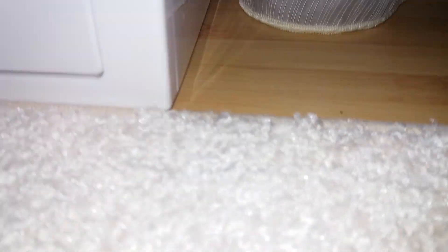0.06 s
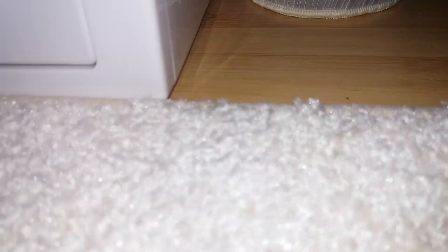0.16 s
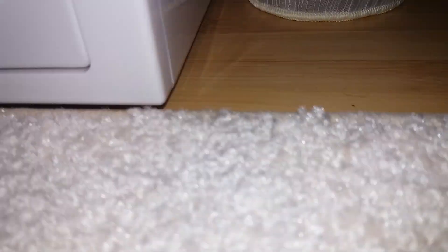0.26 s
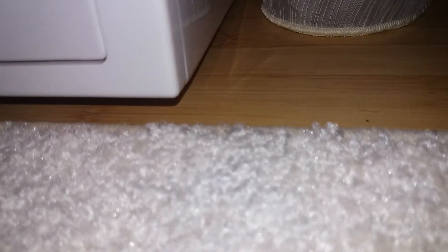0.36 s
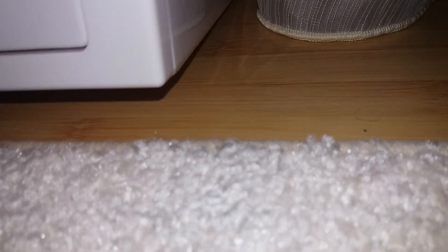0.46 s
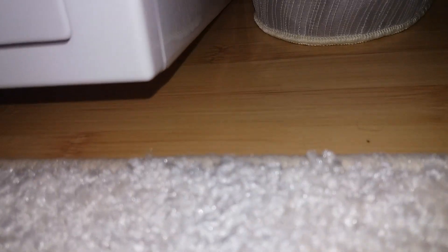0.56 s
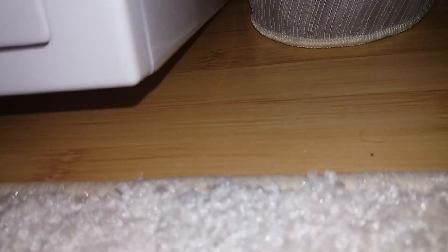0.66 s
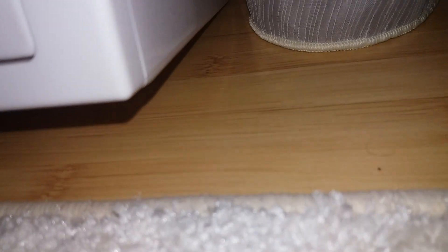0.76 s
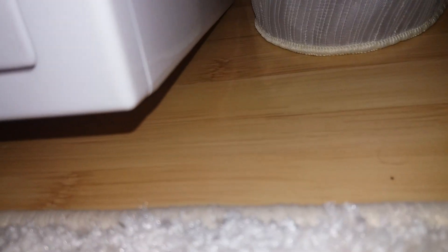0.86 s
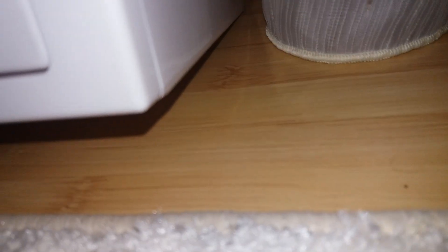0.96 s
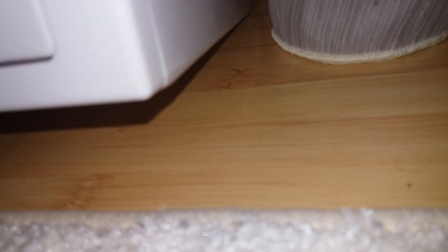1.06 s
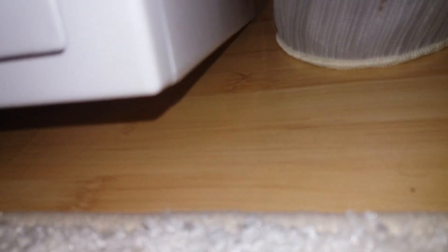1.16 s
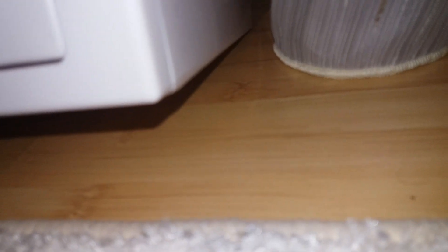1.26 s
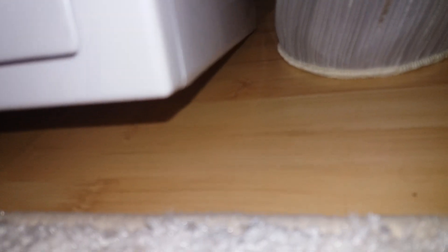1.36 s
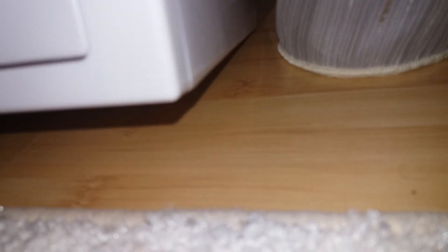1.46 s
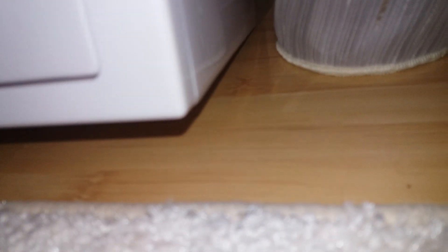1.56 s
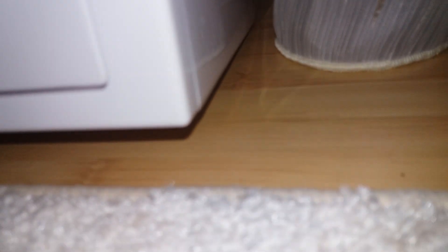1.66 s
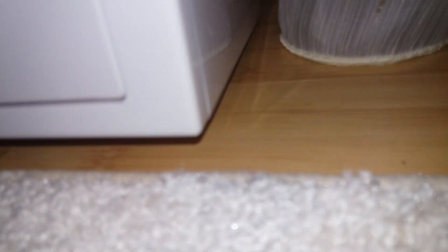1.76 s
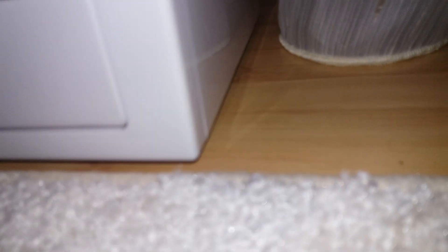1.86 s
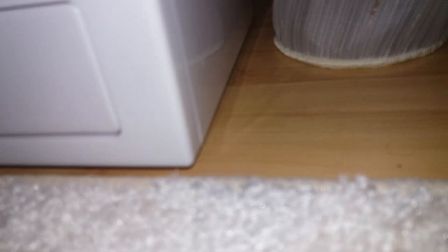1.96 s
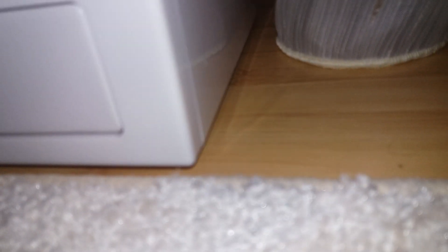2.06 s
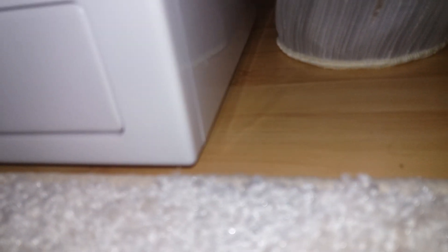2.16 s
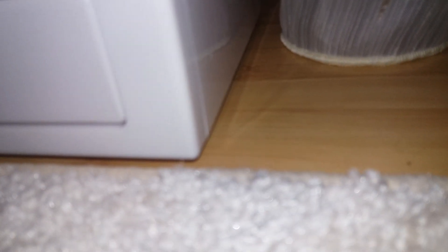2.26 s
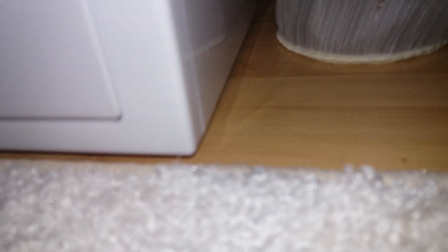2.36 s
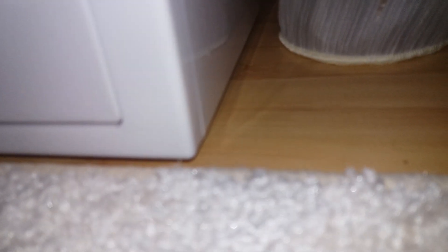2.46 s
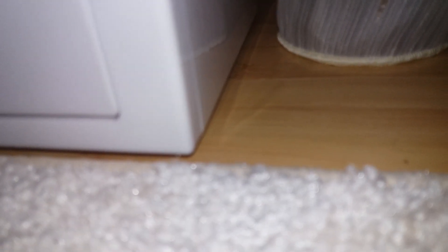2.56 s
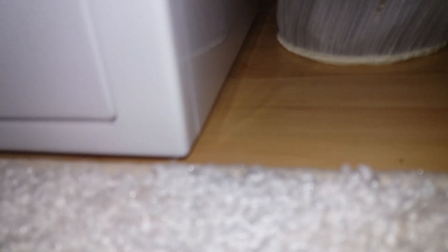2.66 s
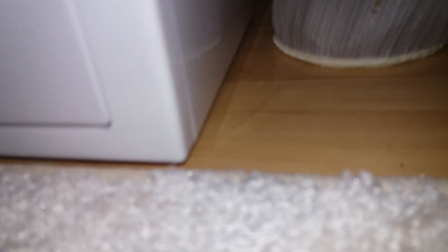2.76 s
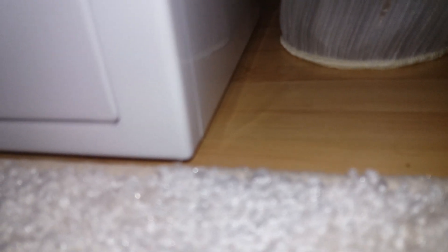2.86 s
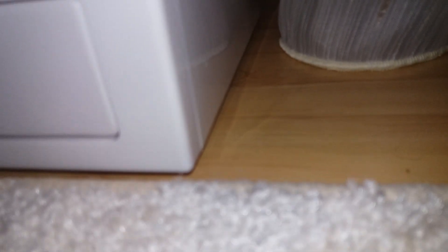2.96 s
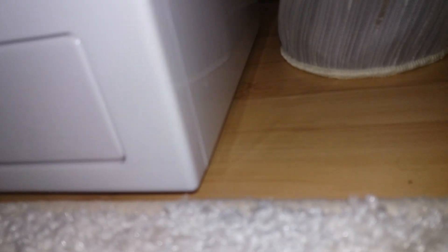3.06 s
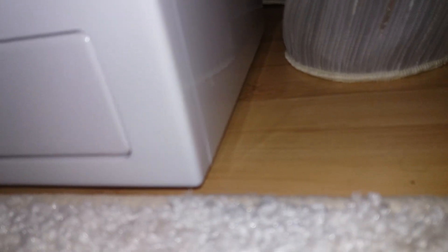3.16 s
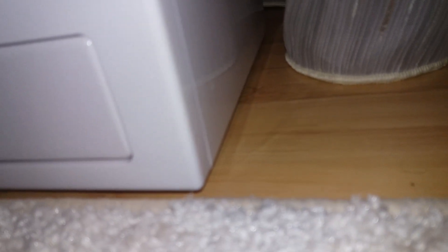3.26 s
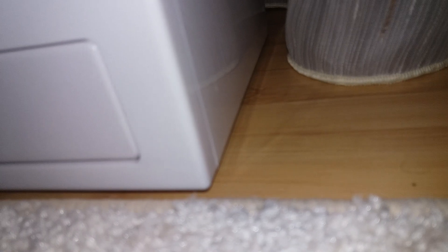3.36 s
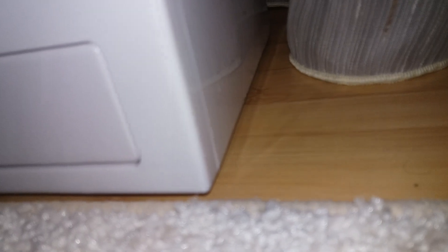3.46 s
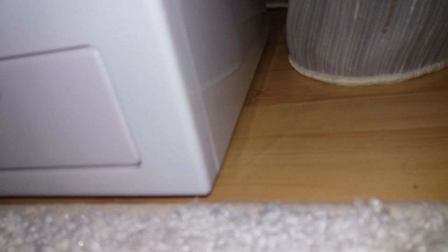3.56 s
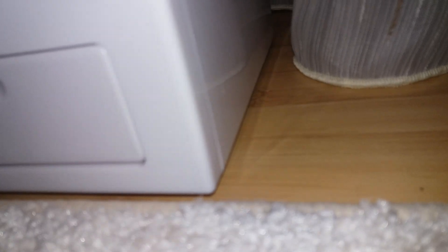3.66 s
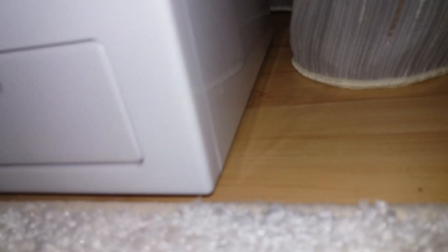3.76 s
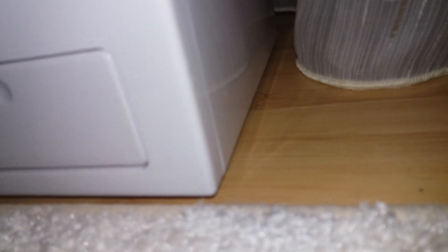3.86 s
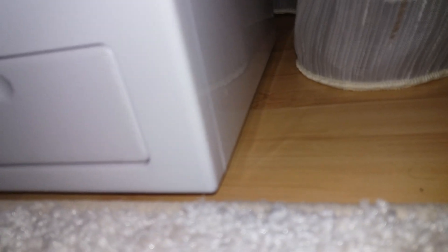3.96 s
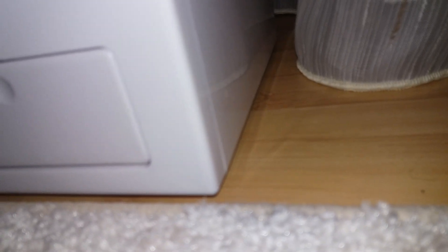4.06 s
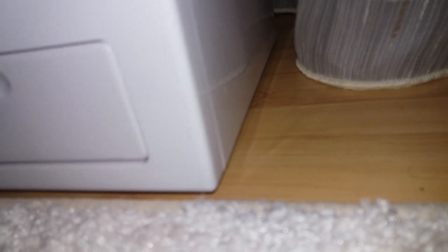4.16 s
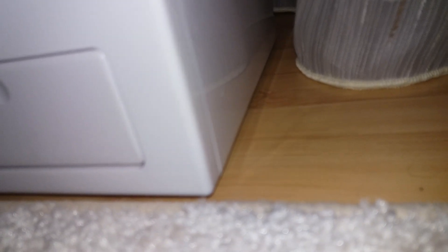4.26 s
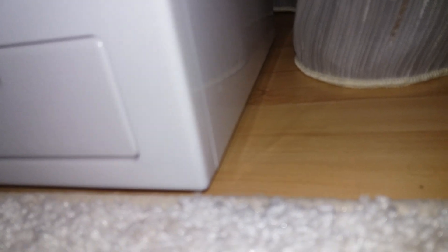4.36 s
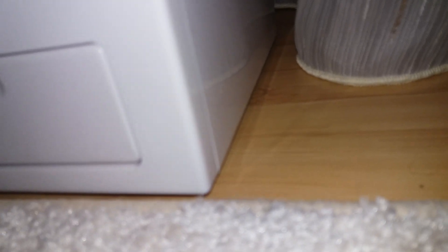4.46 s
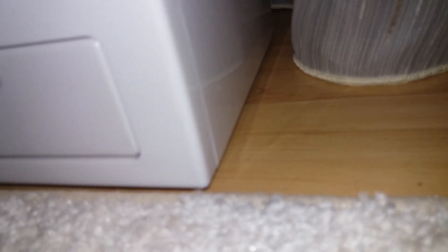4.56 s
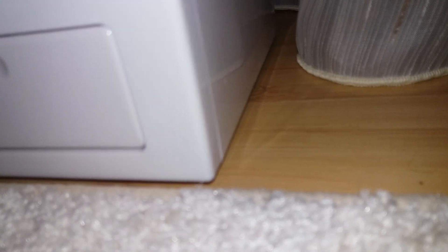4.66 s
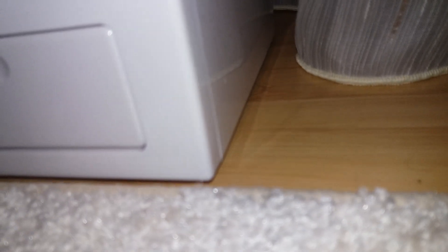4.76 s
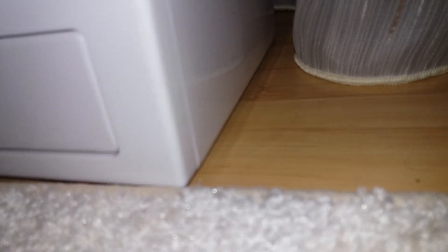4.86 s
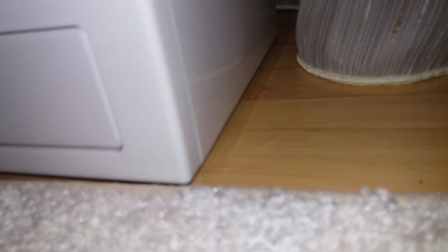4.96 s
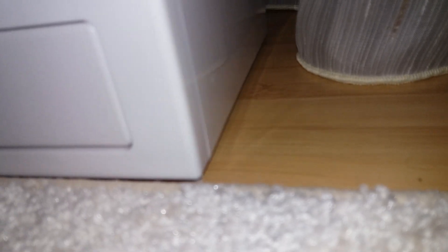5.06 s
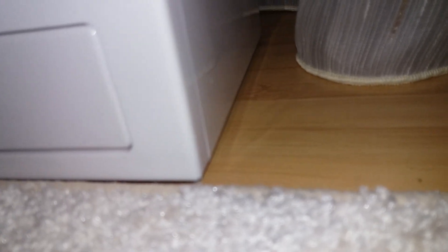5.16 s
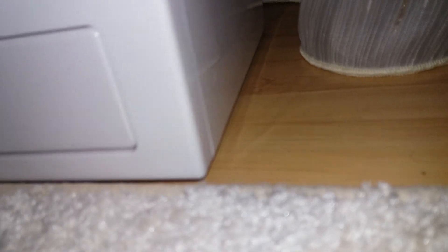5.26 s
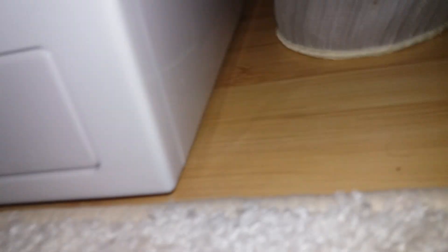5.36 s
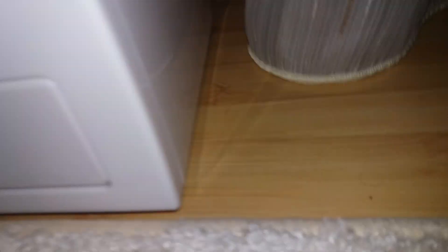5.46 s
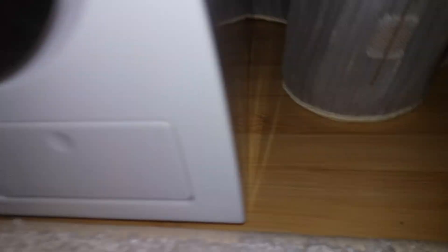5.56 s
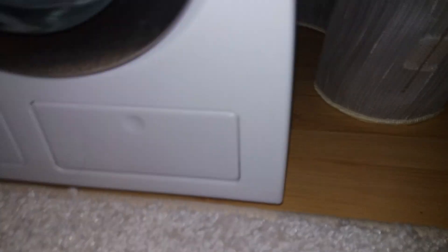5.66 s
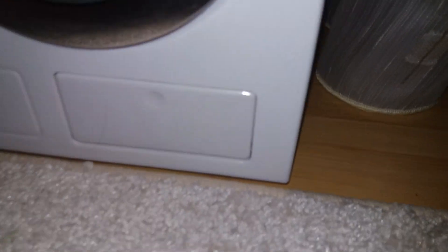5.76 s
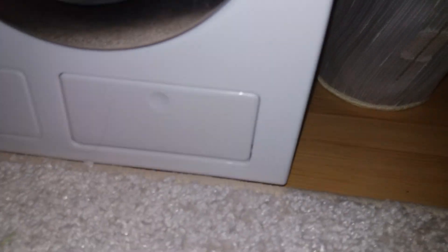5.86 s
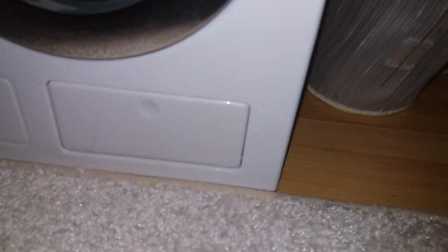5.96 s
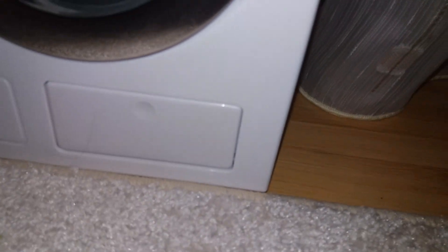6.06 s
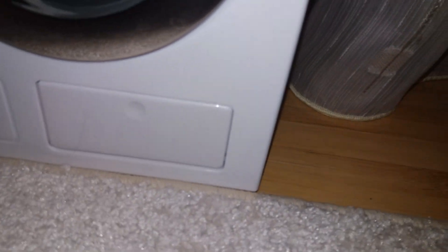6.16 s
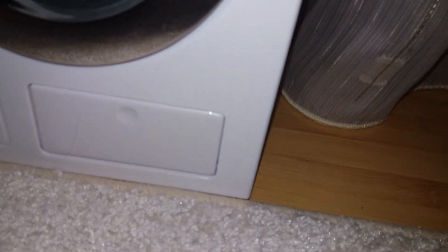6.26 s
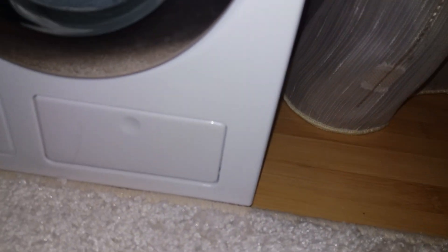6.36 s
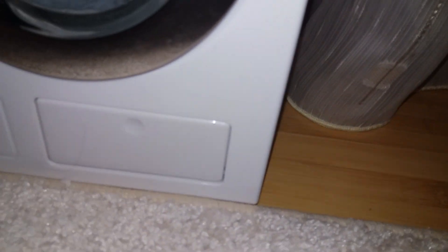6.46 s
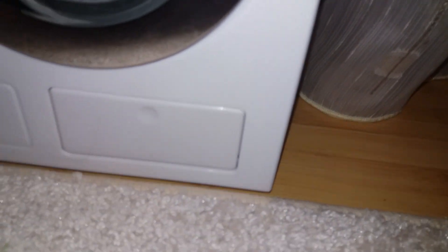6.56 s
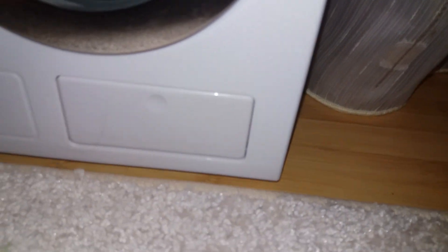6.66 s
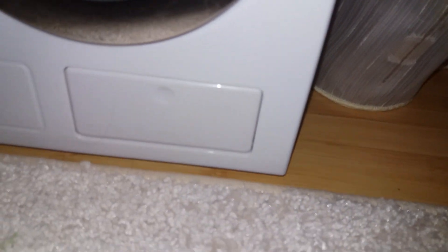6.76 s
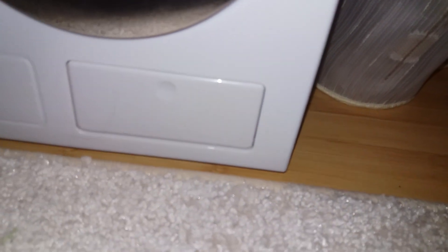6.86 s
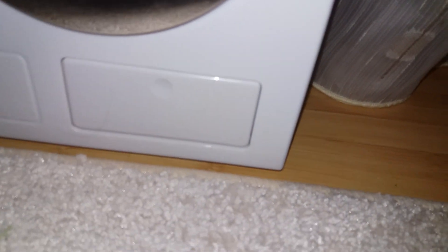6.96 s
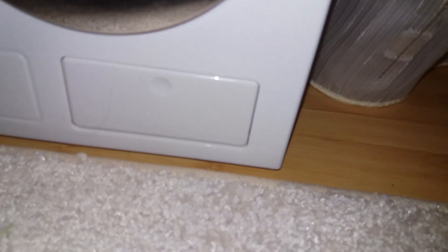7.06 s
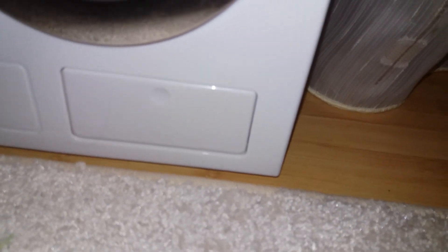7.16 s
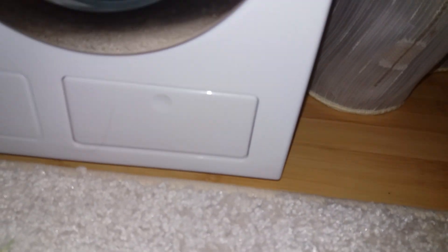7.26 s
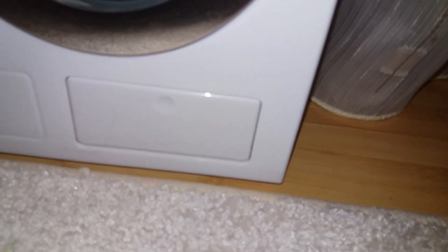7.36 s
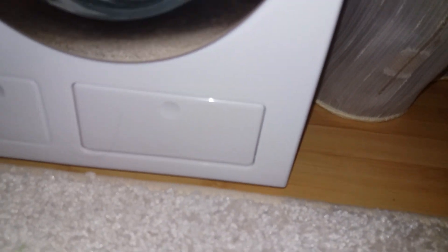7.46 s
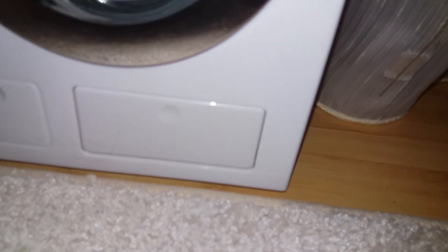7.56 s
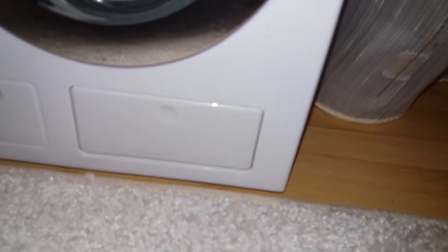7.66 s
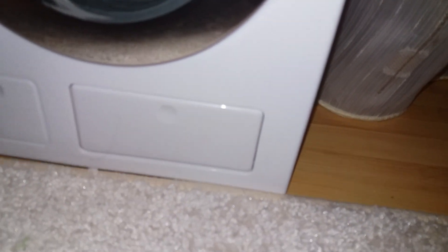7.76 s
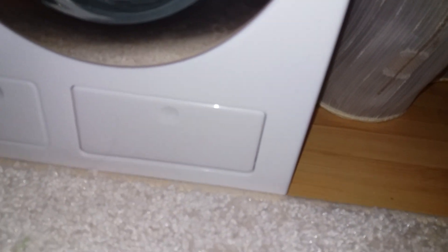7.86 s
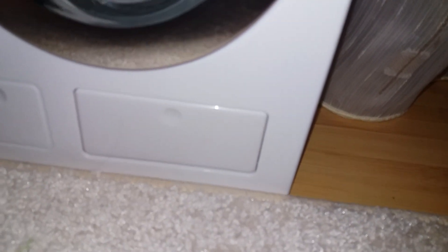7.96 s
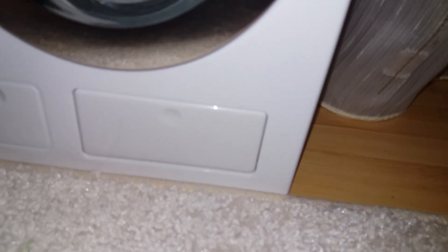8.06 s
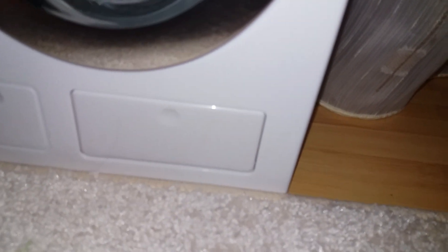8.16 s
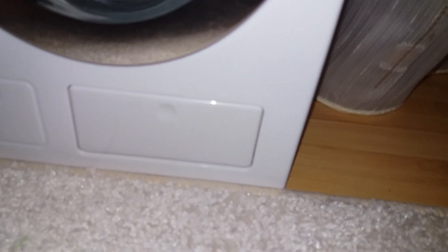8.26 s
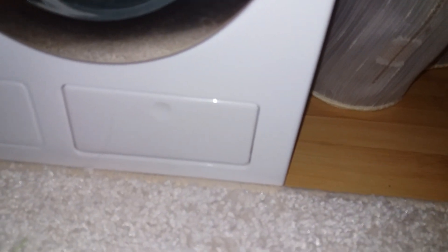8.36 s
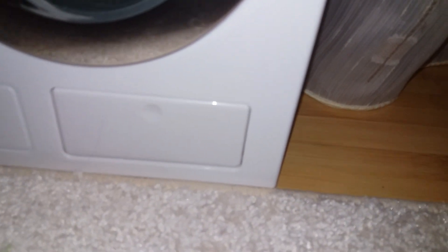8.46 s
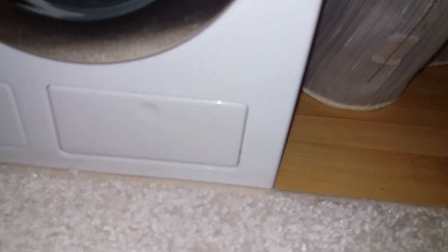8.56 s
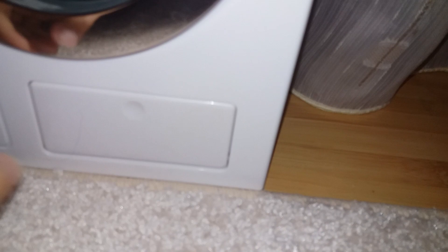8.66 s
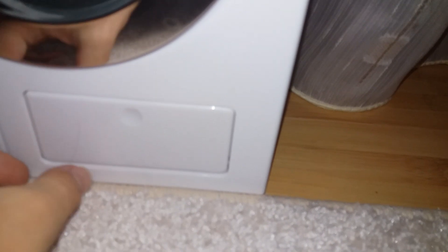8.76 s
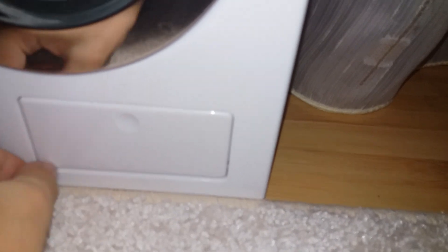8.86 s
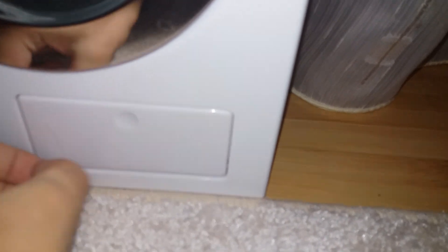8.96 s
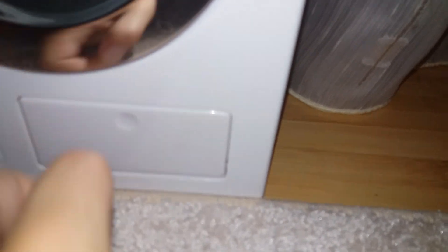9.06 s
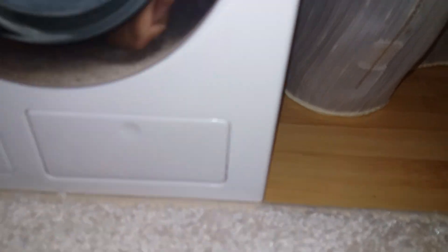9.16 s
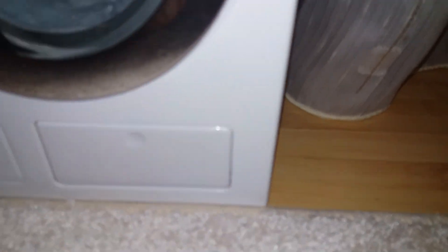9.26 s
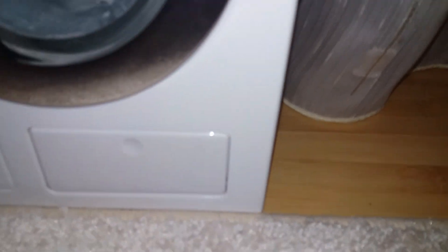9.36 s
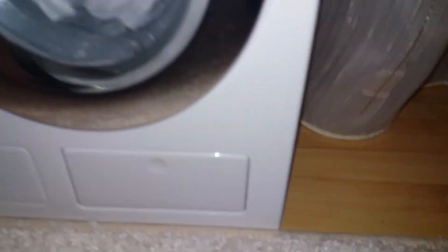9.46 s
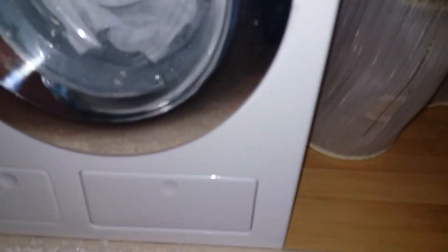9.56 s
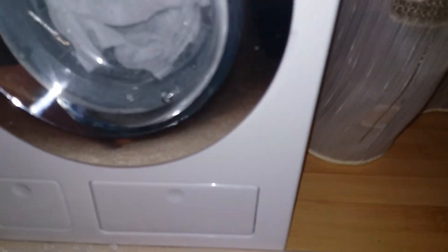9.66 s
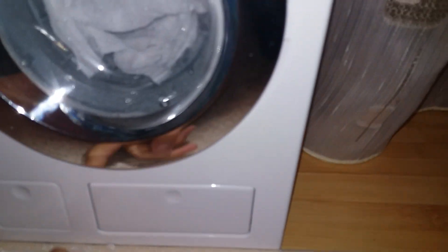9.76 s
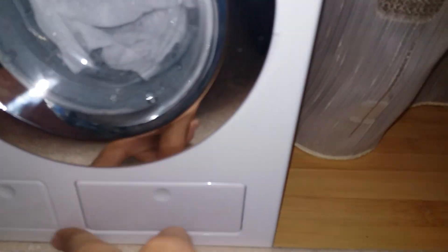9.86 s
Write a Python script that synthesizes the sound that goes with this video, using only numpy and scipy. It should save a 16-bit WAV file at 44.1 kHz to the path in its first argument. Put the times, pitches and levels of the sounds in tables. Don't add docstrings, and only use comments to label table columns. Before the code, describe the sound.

Irregular plastic knocks, clicks and scuffs from a hollow toy appliance, one huge drum-like bang early, over faint hum in a small room.

```python
import sys
import numpy as np
from scipy import signal
from scipy.fft import rfft, irfft
from scipy.io import wavfile

SR = 44100
rng = np.random.default_rng(int(sys.argv[2]) if len(sys.argv) > 2 else 0)


def ratio_of_db(decibels):
    return 10 ** (np.asarray(decibels, float) / 20)


def digitize_waveform(pressure):
    field = np.atleast_2d(pressure).T
    bounded = np.clip(field, -1, 1)
    quanta = np.round(bounded * 32767).astype(np.int16)
    wavfile.write(sys.argv[1], SR, quanta)


N = 437031
AFTER = np.arange(SR // 2) / SR

# (frequency [Hz], level [dB], t60 [s])
BOOM = [(151, -2.5, 0.42), (190, -4.5, 0.38), (221, 4, 0.12), (275, -13, 0.45)]
# (frequency [Hz], level [dB], t60 [s])
PANEL = [(354, -10.5, 0.048), (437.4, -2, 0.095), (516, -4.5, 0.052), (615, -6.5, 0.044),
         (710, -11.5, 0.11), (783, -10, 0.066), (863.6, -8.5, 0.11), (925, -9, 0.1), (1050, -12.5, 0.16),
         (1240, -11.5, 0.0062)]


def rms_one(x):
    return x / np.sqrt(np.mean(x ** 2) + 1e-20)


def peak_one(x):
    return x / (np.max(np.abs(x)) + 1e-12)


def band(x, low_hz, high_hz):
    return signal.sosfilt(signal.butter(2, [low_hz, high_hz], "band", fs=SR, output="sos"), x)


def coloured(x, points):
    hz, level_db = np.transpose(points)
    log_hz = np.log(np.fft.rfftfreq(N, 1 / SR) + 1)
    shape_db = np.interp(log_hz, np.log(hz), level_db)
    shape_db -= 40 * np.maximum(log_hz - np.log(hz[-1]), 0)
    return rms_one(irfft(rfft(x) * ratio_of_db(shape_db), N))


def resonate(x, hz, width_hz):
    r = np.exp(-np.pi * width_hz / SR)
    feedback = [1, -2 * r * np.cos(2 * np.pi * hz / SR), r * r]
    return signal.lfilter((1 - r * r) / 2 * np.array([1, 0, -1]), feedback, x)


def drift(rate_per_s):
    steps = rng.standard_normal(4000)
    return np.interp(np.arange(N) / SR * rate_per_s, np.arange(len(steps)), steps)


def stroke(middle_s, length_s):
    out = np.zeros(N)
    first = max(round((middle_s - length_s) * SR), 0)
    last = min(round((middle_s + length_s) * SR), N)
    near = np.arange(first, last)
    out[near] = np.cos(np.pi / 2 * np.clip((near / SR - middle_s) / length_s, -1, 1)) ** 2
    return out


def struck(modes, spread_db):
    hz, level_db, t60_s = np.transpose(modes)[:, :, None]
    luck = rng.standard_normal((len(modes), 1))
    decay = ratio_of_db(level_db + spread_db * luck - 60 * AFTER / t60_s)
    return peak_one(np.sum(decay * np.sin(2 * np.pi * hz * AFTER), axis=0))


def dying(low_hz, high_hz, t60_s):
    return peak_one(band(rng.standard_normal(len(AFTER)) * ratio_of_db(-60 * AFTER / t60_s), low_hz, high_hz))


def rattled(ringing, length_s, cut_hz):
    chatter = rng.standard_normal(SR // 16) * np.exp(-AFTER[:SR // 16] / length_s)
    chatter[0] = 5.35
    soft = signal.sosfilt(signal.butter(4, cut_hz, fs=SR, output="sos"), chatter)
    soft = band(soft, 120, cut_hz)
    return peak_one(signal.fftconvolve(ringing, soft)[:len(AFTER)])


def add(out, s, sound):
    i = round(s * SR)
    out[i:i + len(sound)] += sound[:N - i]


def background():
    # (frequency [Hz], width [Hz], level [dB])
    hum_bands = [(89, 14, -86.5), (169, 9, -70.5)]
    # (frequency [Hz], density [dB per Hz])
    air_and_hiss_points = [(20, -35), (33, -35), (50, 0), (80, -3), (170, -7), (300, -5.5), (600, -18),
                           (1200, -19), (2500, -21), (4000, -28), (6500, -32.5), (10000, -32.5), (16000, -30.5)]
    hum = sum(ratio_of_db(level_db) * rms_one(resonate(rng.standard_normal(N), hz, width_hz))
              for hz, width_hz, level_db in hum_bands)
    return hum + ratio_of_db(-67.5) * coloured(rng.standard_normal(N), air_and_hiss_points)


def room():
    # (frequency [Hz], t60 [s], level [dB])
    room_bands = [(486, 0.16, -3.5), (1200, 0.084, -10), (2510, 0.25, -11.5), (4686, 0.14, -8),
                  (9050, 0.091, -21.5)]
    half_width = 1.55
    tail = np.zeros(len(AFTER))
    for hz, t60_s, level_db in room_bands:
        noise = rms_one(band(rng.standard_normal(len(AFTER)), hz / half_width, hz * half_width))
        gain = ratio_of_db(level_db) * np.sqrt(hz / t60_s / SR ** 2 * 30)
        tail += gain * noise * ratio_of_db(-60 * AFTER / t60_s)
    return tail * np.clip((AFTER - .004) / 0.0016, 0, 1)


def squeaks():
    # (middle [s], length [s], level [dB], frequency [Hz], width [Hz])
    squeak_events = [(0.035, 0.11, -63.5, 2030, 260), (0.092, 0.07, -69, 3980, 260),
                     (0.19, 0.078, -69, 3600, 240), (6.265, .03, -72, 3600, 250),
                     (3.453, .05, -64, 2450, 150)]
    out = np.zeros(N)
    for middle_s, length_s, level_db, hz, width_hz in squeak_events:
        tone = resonate(resonate(rng.standard_normal(N), hz, width_hz), hz, 3 * width_hz)
        out += ratio_of_db(level_db) * stroke(middle_s, length_s) * rms_one(tone)
    return out


def drag():
    # (time [s], level [dB])
    handling = [(0, -70), (.3, -75), (.88, -62.5), (1.1, -69), (1.45, -74), (1.8, -65.5), (2.4, -73),
                (3.1, -77.5), (3.64, -68.5), (4.2, -76.5), (4.8, -78), (5.5, -70.5), (6.7, -74),
                (6.95, -84), (8.1, -80), (8.85, -70), (9.08, -71), (9.62, -86)]
    # (middle [s], length [s], scuff [dB], body [dB], floor shake [dB])
    leans = [(0.136, 0.11, -70, -63, -93), (0.304, 0.18, -88, -90, -69), (0.5, 0.18, -78, -63.5, -80),
             (0.86, 0.15, -74, -91, -78), (1.346, 0.14, -76.5, -67, -51.5), (1.584, 0.19, -87, -77, -53.5),
             (2.061, 0.23, -68, -58, -52.5), (2.543, 0.43, -100, -86.5, -73),
             (3.237, 0.19, -66.5, -59.5, -62), (3.58, 0.27, -84, -66, -62), (3.937, 0.37, -99, -82, -67),
             (4.748, 0.37, -87, -82.5, -67), (5.135, 0.27, -74.5, -64, -62), (6.018, 0.11, -76.5, -68, -55),
             (6.323, 0.26, -68.5, -61, -60), (6.546, 0.26, -79, -80, -56), (6.75, 0.18, -72, -70.5, -66),
             (7.156, 0.31, -93.5, -83.5, -72.5), (7.9, 0.19, -73.5, -67.5, -62),
             (8.416, 0.19, -72.5, -68, -59.5), (9.573, 0.34, -76.5, -108, -71.5)]
    # (middle [s], length [s], scuff [dB], body [dB], fizz [dB])
    slips = [(0.178, 0.32, -82, -84, -74.5), (1.567, 0.013, -74, -93, -98), (1.77, 0.021, -61, -56, -99),
             (1.852, 0.066, -65.5, -64, -95), (1.974, 0.014, -61, -59, -99), (3.19, 0.014, -65, -52, -87),
             (3.475, 0.07, -58, -49.5, -82), (3.863, .05, -74.5, -81, -93.5), (4.971, 0.087, -61, -53, -90),
             (5.172, 0.075, -59.5, -56.5, -82), (5.177, 0.034, -59.5, -56, -77),
             (5.469, 0.036, -55.5, -58, -92), (5.54, 0.13, -101, -82, -79),
             (5.756, 0.11, -73.5, -76, -89.5), (5.896, 0.076, -69.5, -87, -96),
             (6.362, 0.016, -61, -57, -89), (6.428, 0.034, -72, -66, -88), (6.561, 0.02, -63, -50, -95),
             (6.604, 0.046, -74, -66, -82), (6.697, 0.11, -66.5, -59, -84), (8.371, 0.042, -66, -54.5, -92),
             (8.504, 0.087, -75.5, -84, -93.5), (9.168, 0.0028, -59, -90, -56),
             (9.155, 0.056, -65, -85, -90), (9.283, 0.064, -59, -80, -76), (9.365, 0.068, -68, -85, -85),
             (9.606, 0.12, -78, -94, -94), (9.91, 0.066, -67.5, -82, -86)]
    # (frequency [Hz], density [dB per Hz])
    scuff_points = [(200, -22.5), (500, -13.5), (1000, -3.5), (1600, 3.5), (2400, -1), (3300, -5),
                    (4300, -13.5), (5500, -29)]
    # (frequency [Hz], density [dB per Hz])
    fizz_points = [(2500, -32), (4000, -3), (5500, -3.5), (7500, -9.5), (11000, -20.5)]

    busy_db = np.interp(np.arange(N) / SR, *np.transpose(handling))
    swing_db = busy_db + 73
    scuff_gain = ratio_of_db(busy_db)
    body_gain = ratio_of_db(-68.5 + 0.11 * swing_db)
    shake_gain = ratio_of_db(-74.5 + 0.1 * swing_db)
    for middle_s, length_s, scuff_db, body_db, shake_db in leans:
        shape = stroke(middle_s, length_s)
        scuff_gain += ratio_of_db(scuff_db) * shape
        body_gain += ratio_of_db(body_db) * shape
        shake_gain += ratio_of_db(shake_db) * shape
    fizz_gain = ratio_of_db(-18) * scuff_gain
    for middle_s, length_s, scuff_db, body_db, fizz_db in slips:
        shape = stroke(middle_s, length_s)
        scuff_gain += ratio_of_db(scuff_db) * shape
        body_gain += ratio_of_db(body_db) * shape
        fizz_gain += ratio_of_db(fizz_db) * shape

    grains = (rng.random(N) < 9000 / SR) * rng.choice([-1, 1], N)
    grains = grains * ratio_of_db(1.66 * np.minimum(rng.exponential(1, N), 4))
    scuff = coloured(grains, scuff_points) * scuff_gain + coloured(grains, fizz_points) * fizz_gain
    scuff *= ratio_of_db(1.2 * drift(70))
    body = sum(ratio_of_db(level_db) * resonate(grains, hz, 2.8 / t60_s + 12) / np.sqrt(hz)
               for hz, level_db, t60_s in BOOM + PANEL)
    body = rms_one(band(body, 130, 1500))
    shake = resonate(resonate(rng.standard_normal(N), 96, 40), 67, 90)
    shake = rms_one(shake + ratio_of_db(-20.0) * resonate(rng.standard_normal(N), 40, 20))
    return scuff + body * body_gain * ratio_of_db(1.9 * drift(25)) + shake * shake_gain


def single_modes(events):
    out = np.zeros(N)
    for s, peak_db, hz, t60_s in events:
        onset = 1 - np.exp(-AFTER / max(.0008, 0.56 / hz))
        add(out, s, ratio_of_db(peak_db) * peak_one(struck([(hz, 0, t60_s)], spread_db=0) * onset))
    return out


def clinks():
    # (time [s], peak [dB], frequency [Hz], t60 [s])
    clink_events = [(.152, -33.5, 3530, 0.011), (1.246, -48, 2600, 0.025), (1.600, -44, 422, 0.11),
                    (1.7851, -31.5, 2510, 0.012), (1.8101, -42.5, 2570, 0.021), (4.515, -62, 597, 0.15),
                    (4.572, -59, 597, 0.14), (4.700, -45.5, 400, 0.062), (6.142, -46, 3500, 0.026),
                    (6.1431, -33, 925, 0.084), (6.287, -42, 761, 0.049), (7.895, -54, 904, 0.03),
                    (1.786, -44, 3300, 0.0116)]
    return single_modes(clink_events)


def rings():
    # (time [s], peak [dB], frequency [Hz], t60 [s])
    ring_events = [(1.9985, -18, 1600, 0.028), (1.998, -23, 350, .08), (1.999, -27, 860, 0.087),
                   (2.003, -33.5, 1335, .07), (1.999, -34.5, 4400, .02), (6.143, -29.5, 428, 0.1),
                   (6.143, -40, 2120, 0.029), (6.143, -47, 1520, 0.043), (3.408, -48, 2700, .025),
                   (3.095, -46, 3200, 0.012), (4.699, -56, 1150, .04), (4.699, -51, 1790, 0.02),
                   (2.738, -55, 1100, 0.043), (1.602, -43, 333, .08), (3.59, -43, 895, .05),
                   (0.434, -43, 637, .05), (8.951, -48, 1150, 0.046), (9.165, -49, 1400, 0.012),
                   (0.034, -40.5, 620, 0.065), (3.8, -51, 63, 0.21), (3.81, -68, 60, .15),
                   (4.07, -62, 61, 0.19), (3.412, -37.5, 232, 0.33), (0.451, -34.5, 232, 0.21),
                   (8.37, -46, 130, .3), (5.22, -51.5, 61, 0.24), (1.9, -52, 82, .2)]
    return single_modes(ring_events)


def overtones():
    # (time [s], peak [dB], frequency [Hz], t60 [s])
    overtone_events = [(2.003, -36, 1065, .09), (1.998, -27, 2550, .01), (1.998, -24, 2000, .015),
                       (1.998, -25, 890, 0.036), (2.012, -33, 533, .12), (1.998, -23, 422, .04),
                       (2.105, -41, 229.2, 0.49), (1.999, -33, 2940, 0.061), (6.15, -45, 505, .1),
                       (6.143, -45, 1870, .07), (6.143, -47, 649, .12), (6.19, -55, 1010, .05),
                       (6.287, -51, 2050, .02), (6.287, -49, 1500, .03), (6.292, -47, 523, 0.053),
                       (6.425, -54.5, 1080, .06), (6.553, -53, 1410, .03), (6.651, -57, 1096, .06),
                       (3.096, -50, 927, .06), (3.096, -49, 1334, .05), (3.096, -49, 2024, .03),
                       (3.096, -51, 2369, .05), (3.096, -48, 3500, .03), (3.404, -44, 3150, .02),
                       (0.3035, -50, 2950, .012), (0.3035, -50, 3700, .015), (1.602, -45, 870, .07),
                       (0.772, -47.5, 1800, .02), (2.742, -44, 232, .2), (4.7, -42, 524, 0.062),
                       (4.706, -36.5, 214.5, 0.14), (4.329, -43.5, 590, .05), (4.345, -42, 228, 0.13),
                       (4.392, -47.5, 521, 0.063), (8.362, -46, 498, .1), (8.362, -52, 910, 0.092),
                       (8.365, -55, 1300, 0.062), (8.951, -50, 2026, .07), (8.951, -44.5, 420, .05),
                       (5.157, -41, 225, .1), (5.172, -35.5, 230, 0.075), (0.434, -44, 500, 0.065),
                       (8.975, -52, 417, .06)]
    return single_modes(overtone_events)


def buzzes():
    # (time [s], peak [dB], low edge [Hz], high edge [Hz], t60 [s])
    buzz_events = [(2.02, -47, 2600, 5200, .25), (8.336, -61, 2800, 4600, .08),
                   (8.347, -60, 2800, 5000, .06), (2.01, -38, 1500, 3600, .2),
                   (3.5862, -38, 1000, 4500, .008), (7.894, -50, 500, 2200, .01),
                   (0.3032, -46, 1800, 4200, .02), (0.432, -46, 1500, 3200, .025),
                   (4.327, -48, 900, 3000, .03), (6.1418, -36, 700, 4000, .01),
                   (1.602, -48, 1300, 2600, .015), (6.2865, -46, 600, 2200, .02),
                   (6.286, -58, 3500, 6000, .04), (6.318, -58, 3400, 4500, .04),
                   (6.548, -58, 2500, 4200, .04), (9.4, -55, 600, 2000, .03), (0.152, -56, 3700, 7500, .2)]
    out = np.zeros(N)
    for s, peak_db, low_hz, high_hz, t60_s in buzz_events:
        rattle = band(dying(low_hz, high_hz, t60_s), low_hz / 2, high_hz)
        add(out, s, ratio_of_db(peak_db) * peak_one(rattle))
    return out


def ticks():
    tick_times_s = [0.029, 0.1517, 0.3026, 0.432, 0.771, 1.9975, 2.737, 3.0945, 3.4028, 4.3264, 6.1415,
                    8.34, 8.906, 9.165, 9.165, 9.178, 2.001, 6.146, 3.5862, 3.523, 6.286, 7.894, 8.36,
                    3.219, 3.243, 3.178, 1.96, 1.645, 6.552, 0.117, 3.41, 4.697]
    # (peak [dB], low edge [Hz], high edge [Hz], t60 [s])
    tick_bands = [(-43, 2500, 6100, .02), (-50, 5000, 15000, .015), (-45, 2100, 8100, 0.023),
                  (-53, 3000, 7800, .015), (-55, 4000, 11000, .012), (-48, 5500, 11000, .02),
                  (-54, 3000, 6500, .015), (-47, 3300, 10400, .02), (-52, 2400, 9600, 0.018),
                  (-52, 3400, 6200, .015), (-53, 3800, 6300, .02), (-56, 2600, 6000, .04),
                  (-54, 600, 3500, .015), (-39, 2000, 4400, 0.0098), (-52, 5500, 13000, .007),
                  (-65, 3000, 9000, .01), (-32, 800, 4300, 0.22), (-39.5, 770, 4000, 0.2),
                  (-33.5, 1100, 3840, 0.011), (-36, 1300, 3500, .03), (-47, 540, 1900, .06),
                  (-53, 500, 1800, .03), (-46.5, 740, 2300, 0.098), (-60, 5000, 11000, .012),
                  (-56, 3000, 8500, 0.036), (-56, 1500, 4500, .05), (-54, 970, 3500, .02),
                  (-54, 600, 2000, .02), (-48, 460, 1900, .05), (-44, 2700, 5200, .015),
                  (-42, 970, 4400, 0.095), (-46, 710, 3500, 0.017)]
    out = np.zeros(N)
    for s, (peak_db, low_hz, high_hz, t60_s) in zip(tick_times_s, tick_bands):
        spit = band(dying(low_hz, high_hz, t60_s), low_hz / 2, high_hz * 0.67)
        add(out, s, ratio_of_db(peak_db) * peak_one(spit))
    return out


def thuds():
    # (time [s], boom peak [dB], frequency [Hz], panel [dB], t60 [s])
    thud_events = [(1.217, -28, 129, -43, 0.061), (1.252, -37.5, 116, -66, 0.12),
                   (2.574, -50, 235, -61, 0.13), (2.899, -56.5, 198, -55, 0.22),
                   (3.19, -42.5, 140, -69, 0.21), (3.469, -38, 190, -42.5, 0.24),
                   (3.493, -32, 226, -34.5, 0.091), (3.734, -53, 228, -52.5, 0.033),
                   (3.996, -54, 207, -63, .15), (4.152, -52, 227.4, -47, 0.29),
                   (4.292, -44.5, 225, -54, 0.15), (4.388, -41.5, 231, -48, 0.14),
                   (5.164, -38, 221, -44.5, 0.16), (5.213, -36, 177, -52.5, 0.095),
                   (6.016, -40, 237.4, -59, 0.26), (6.596, -39.5, 232, -51, 0.036),
                   (6.669, -40.5, 237.4, -57, 0.26), (8.059, -53, 230.4, -61, 0.16),
                   (8.313, -49, 240, -49.5, 0.1), (8.357, -31.5, 241.7, -42.5, 0.2),
                   (8.904, -67, 319, -50, 0.16), (1.27, -47, 96.6, -75, 0.94), (4.245, -53, 231, -53, 0.12)]
    out = np.zeros(N)
    push = np.hanning(round(0.0026 * SR))
    for s, boom_db, hz, panel_db, t60_s in thud_events:
        walls_db = -10.5 + 10 * np.log2(hz / 220)
        walls = [(wall_hz, level_db + walls_db, wall_t60_s) for wall_hz, level_db, wall_t60_s in BOOM]
        low = struck([(hz, 0, t60_s)] + walls, spread_db=4.0) * (1 - np.exp(-AFTER / 0.0045))
        low = peak_one(np.convolve(low, push))[:len(AFTER)]
        panel = (1 - np.exp(-AFTER / 0.0054)) * dying(166, 516, 0.086)
        add(out, s, ratio_of_db(boom_db) * low + ratio_of_db(panel_db + 5.0) * panel)
    return out


def booms():
    # (time [s], peak [dB], frequency [Hz], share ringing after settling [ratio])
    boom_events = [(0.035, -36.5, 178, 0.13), (0.148, -51, 231, 0.08), (0.435, -32.5, 221.6, 0.88),
                   (1.602, -28.5, 278, 0.08), (1.996, -5, 223.4, 0.18), (2.74, -35.5, 183, 0.072),
                   (3.092, -28.5, 275, 0.08), (3.225, -50, 196, 0.08), (3.243, -30, 178, 0.086),
                   (3.404, -29.5, 184, 0.074), (3.52, -40, 234, 0.08), (3.586, -26, 210.6, 0.073),
                   (4.328, -37.5, 225, 0.4), (4.698, -32.5, 221, 0.4), (6.145, -14.5, 228, 0.08),
                   (6.365, -35, 230, 0.093), (6.549, -30.5, 181, 0.092), (7.894, -29, 211, 0.077),
                   (8.948, -47, 279, 0.08)]
    out = np.zeros(N)
    swell = 1 - np.exp(-AFTER / 0.0022)
    settle = 1 / (1 + np.exp((AFTER - .036) / 0.0014))
    cavity = ratio_of_db(-21.5) * struck([(231, 0, 0.59), (246, -7.5, 0.59)], spread_db=0.5)
    for s, boom_db, hz, left in boom_events:
        walls = struck(BOOM + [(hz, 0, .25)], spread_db=4.0) * (settle + left * (1 - settle))
        add(out, s, ratio_of_db(boom_db) * swell * (walls + cavity))
    return out


def hard_blow(crack_db, crack_hz, panel_db, panel_hz, edge_db, cut_ratio):
    # (frequency [Hz], level [dB], t60 [s])
    shell_modes = [(1340, -5, .006), (1604, -3, .006), (2010, -5, .005), (2300, -5, .005), (2600, -3, .006),
                   (3200, -7, .004), (3700, -9, .004), (4400, -14, .004)]
    uneven_db = 2.5
    crack = struck(shell_modes + [(crack_hz, 0.8, .008)], uneven_db)
    crack = rattled(crack, 0.0056, cut_ratio * crack_hz) + ratio_of_db(-22.0) * dying(1200, 3000, 0.18)
    panel = struck(PANEL + [(panel_hz, 6.0, .05)], uneven_db)
    panel = rattled(panel, 0.0025, 1500) + ratio_of_db(-11.0) * dying(270, 640, 0.13)
    spit = ratio_of_db(edge_db + 0.24 * (crack_db + 37.0)) * dying(2900, 5100, 0.015)
    return ratio_of_db(crack_db) * crack + ratio_of_db(panel_db + 8.5) * panel + spit


def snaps():
    # (time [s], crack peak [dB], crack frequency [Hz], panel [dB], panel frequency [Hz])
    edge_blows = [(0.152, -37, 3400, -48, 663), (0.303, -39, 1600, -47, 645), (0.432, -39, 3300, -44, 600),
                  (0.771, -38, 1940, -57, 530), (3.0946, -29, 2150, -37.5, 720),
                  (3.4032, -34, 2450, -44, 636), (8.95, -31.5, 2400, -42.5, 700),
                  (9.1652, -41, 3560, -71, 1200)]
    out = np.zeros(N)
    for s, *blow in edge_blows:
        add(out, s, hard_blow(*blow, edge_db=-42.5, cut_ratio=2.16))
    return out


def knocks():
    # (time [s], crack peak [dB], crack frequency [Hz], panel [dB], panel frequency [Hz])
    face_blows = [(0.033, -45, 2050, -42.5, 604), (8.357, -62, 1500, -53.5, 940),
                  (0.1174, -37.5, 2120, -51.5, 493), (1.2461, -42, 2540, -59, 910),
                  (1.602, -45, 2300, -37.5, 430), (1.7856, -37.5, 2380, -56, 975),
                  (1.8097, -48, 2600, -53.5, 327), (1.9975, -12.5, 2396, -21, 413),
                  (3.2245, -37.5, 2244, -43, 467), (3.5229, -37, 1700, -42, 890),
                  (3.586, -41.5, 1800, -38.5, 530), (4.19, -49, 1450, -60.5, 615),
                  (4.6993, -43, 1660, -46.5, 538), (6.142, -30.5, 1840, -39.5, 422),
                  (6.286, -44.5, 1900, -49, 755), (6.317, -47, 1800, -60, 665),
                  (7.894, -51.5, 1810, -49, 444), (2.737, -48.5, 2300, -44.5, 615),
                  (3.246, -39, 1546, -48, 406), (4.3264, -44, 2280, -41, 610)]
    out = np.zeros(N)
    for s, *blow in face_blows:
        add(out, s, hard_blow(*blow, edge_db=-66, cut_ratio=2.22))
    return out


def scene():
    steady = background() + squeaks() + drag()
    close = clinks()
    blows = rings() + overtones() + buzzes() + ticks() + thuds() + booms() + snaps() + knocks()
    echo = signal.fftconvolve(blows + ratio_of_db(-5.5) * close, room())[:N]
    return (steady + close + blows + echo)[None]


def top_cut(x):
    return signal.sosfilt(signal.butter(12, 15700, fs=SR, output="sos"), x)


def record(dry):
    heard = signal.sosfilt(signal.butter(6, 46.0, "high", fs=SR, output="sos"), dry)
    rounded = 0.57 * np.tanh(heard / 0.66)
    top = signal.ellip(10, .5, 70, 15850, fs=SR, output="sos")
    return top_cut(signal.sosfilt(top, rounded) - .0005)


dry = scene()
out = record(dry)
digitize_waveform(out)
```